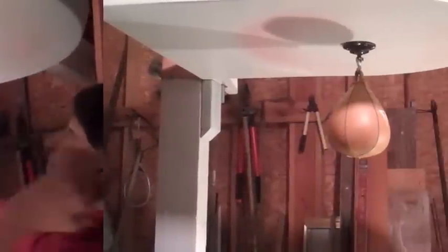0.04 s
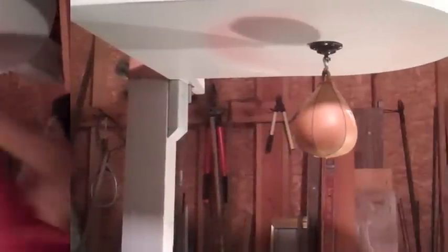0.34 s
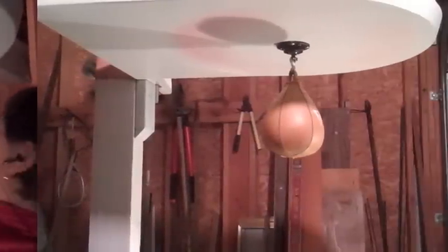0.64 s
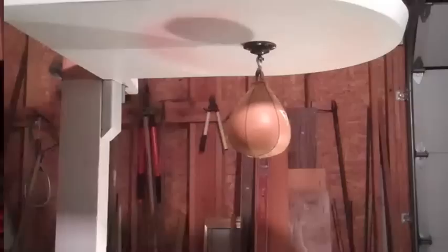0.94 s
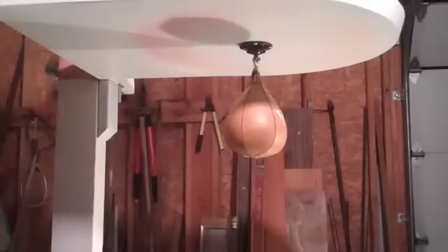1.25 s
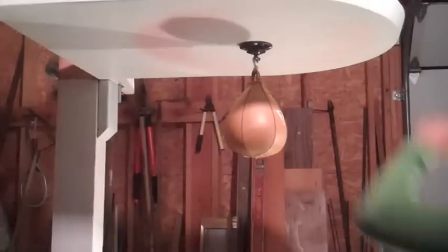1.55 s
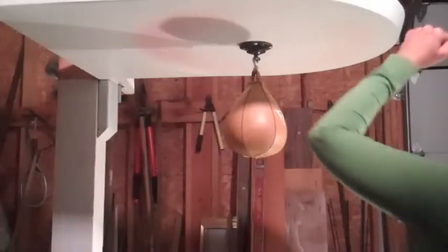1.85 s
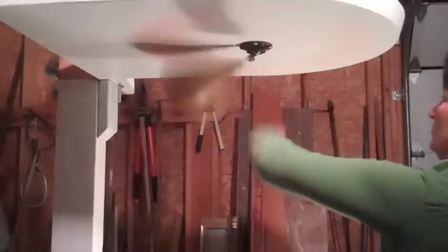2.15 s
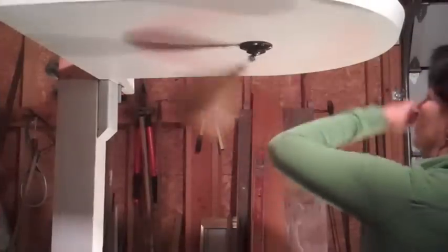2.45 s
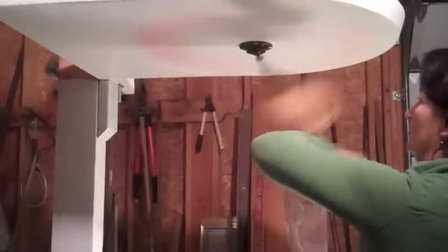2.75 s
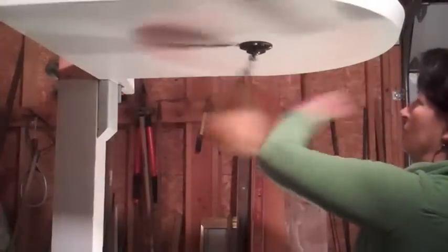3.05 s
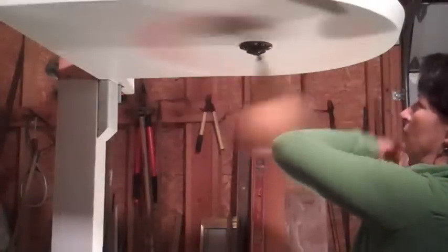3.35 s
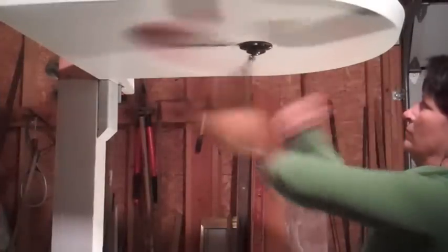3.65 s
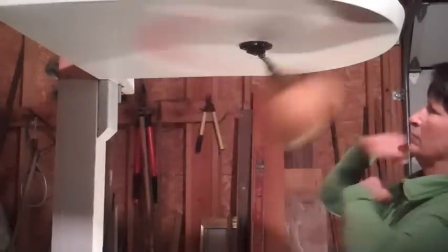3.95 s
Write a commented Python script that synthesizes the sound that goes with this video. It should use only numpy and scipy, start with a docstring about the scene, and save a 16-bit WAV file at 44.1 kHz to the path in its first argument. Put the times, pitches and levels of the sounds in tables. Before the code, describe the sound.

A speed bag is punched close by, hitting its platform about six times a second with sharp slaps, low thuds and metal swivel clacks in a slightly echoing workshop. At about 1 second the flurry stops dead. Faint room noise remains, with two soft bumps around 1.3 and 1.5 seconds. From about 2.1 seconds the rapid rattling rhythm resumes and continues until the end, near 4 seconds.

```python
"""Speed bag in a workshop

A fist strikes a leather bag, which rebounds against its round overhead platform. Each impact radiates a slap
and excites the board's low modes; between impacts the steel swivel clacks. The first flurry breaks off
abruptly, ringing and all, and after a quiet second with soft bumps another begins. Two microphone ports close
by resonate in the treble, and the sharpest slaps overload them."""
import sys
import numpy as np
from scipy import signal
from scipy.fft import rfft, irfft
from scipy.io import wavfile

SR = 44100
rng = np.random.default_rng(int(sys.argv[2]) if len(sys.argv) > 2 else 0)


def master_out(mix):
    """Clip the mix to full scale and print it as 16-bit PCM to the path in sys.argv[1]."""
    frames = np.transpose(np.atleast_2d(mix))
    ceiling = np.clip(frames, -1, 1)
    pcm = np.round(ceiling * 32767).astype(np.int16)
    wavfile.write(sys.argv[1], SR, pcm)


N = 176400

# bag on platform: t/s, slap level/dB, weight of blow/dB, knock f/Hz, knock level/dB
BOARD_IMPACTS = [(.001, 1, -18, 850, 21), (0.117, 15, -18, 1300, 22.5), (0.2761, 1.5, -24.5, 1500, 12.5),
                 (.434, 12, -16, 1360, 18), (.5511, 2, -20.5, 840, 11), (.701, 11.5, -23, 1840, 2),
                 (.887, 6, -27.5, 770, 13), (0.9854, 16, -20.5, 690, 18.5), (1.036, 7.5, -17, 2970, 12),
                 (2.1508, 8.5, -16.5, 1160, 22), (2.2969, 12, -21.5, 1310, 18.5),
                 (2.4783, 8, -26.5, 1300, 15.5), (2.6452, 11.5, -17, 1170, 13),
                 (2.7876, 13.5, -20, 1800, 20), (2.964, 9, -27, 2560, 3), (3.127, 7.5, -18.5, 1130, 0),
                 (3.269, 6.5, -22.5, 780, 17.5), (3.443, 4.5, -27, 4370, 14), (3.5866, 6.5, -20.5, 700, 1),
                 (3.706, 6, -30, 1310, 14), (3.7255, 8, -20.5, 1840, 15.5), (3.887, 11, -26, 7000, 3)]
# fist on bag: t/s, slap level/dB, clatter level/dB, shudder level/dB, dent level/dB
FIST_IMPACTS = [(0.3743, -16, -33, -24.5, -4.5), (.493, 1, -27, -19.5, -7), (2.09, -24, -31, -33, -17),
                (2.585, -2.5, -33.5, -23, -8.5), (3.067, 4, -25.5, -21.5, -13), (3.5299, -8, -37, -25, -13),
                (3.659, -5, -34, -22.5, -6)]
# swivel clacks: t/s, click level/dB, ring level/dB
SWIVEL_CLACKS = [(0.2475, -4.5, -26), (0.4131, 5.5, -16.5), (0.5304, 0, -23), (0.8542, -6, -28.5),
                 (1.021, 7, -14), (2.94, -11, -54), (2.981, -6, -48), (3.421, -9, -58), (3.571, -4, -58)]
# swivel friction: t/s, level/dB, f/Hz
SWIVEL_CHAFES = [(2.326, -46, 1330), (2.944, -41, 1660)]
# bumps in the pause: t/s, dull level/dB, bright level/dB
SOFT_BUMPS = [(1.332, -33.5, -42.5), (1.491, -60, -43)]
# normal modes: f/Hz, level/dB, T60/s
BOARD_MODES = [(88.8, -23, 0.35), (303.3, -9, 0.11), (568.4, -13, 0.19), (809, -19.5, 0.35)]
SWIVEL_MODES = [(2960, 5, 0.009), (3946, -1, 0.079), (4120, -5, .028)]
# spectral envelopes: f/Hz, relative level/dB
SLAP_SPECTRUM = [(60, 0.5), (300, -2), (1200, 2.5), (15000, -3)]
CRINKLE_SPECTRUM = [(1500, -18), (6000, -2)]
RATTLE_SPECTRUM = [(30, -22), (70, -43), (180, -16), (300, 9), (420, 4.5), (5000, 2), (15000, -3.5)]
SWISH_SPECTRUM = [(150, -21), (500, 3), (750, 3), (1200, -12.5), (3000, -21.5)]
SHUDDER_SPECTRUM = [(25, -19.5), (100, -1.5), (170, -3), (400, -11), (700, -13), (2000, -27), (6000, -53)]
BUMP_SPECTRUM = [(40, -16), (280, -0.5), (600, -10.5), (2200, -18.5), (4000, -61)]
ROOM_SPECTRUM = [(25, -7), (120, 12.5), (190, 3), (300, 5.5), (3000, 3), (15000, -3)]
AIR_SPECTRUM = [(25, -15), (60, -15), (140, -8.5), (500, -6.5), (800, -6), (1500, -12), (3500, -17),
                (7000, -19.5), (14000, -21)]
# decay times: f/Hz, T60/s
RATTLE_DECAY = [(100, 0.066), (8000, 0.039)]
ROOM_DECAY = [(100, 0.5), (1200, 0.41), (7000, 0.35), (14000, 0.31)]
# reflections from hard surfaces nearby: delay/s, level/dB
REFLECTIONS = [(.0031, -18), (.012, -11)]
# likeness of left and right: f/Hz, correlation coefficient
COHERENCE = [(300, 0.99), (1000, 0.91), (2000, 0.75), (4000, 0.079), (8000, 0.016)]
# responses of the microphone ports: f/Hz, gain/dB
LEFT_RESPONSE = [(30, -2), (200, -3.5), (4000, 1.5), (6000, 5.5), (7000, 11.5), (7600, 13), (8300, 6),
                 (10000, -3.5), (14000, -12)]
RIGHT_RESPONSE = [(30, 4), (200, -3), (4000, 2), (5500, 5.5), (6300, 12), (7000, 7), (8000, -2.5),
                  (10000, -15), (14000, -17.5)]

CUT_S = 1.0485  # the first flurry and its ringing break off abruptly here
LEAD_S, FLEX_S = 0.0021, 0.0037 - 0.0009  # push ahead of the slap; rise time of the board
SLAP_T60_S, CRINKLE_DB = 0.003, -1
THUMP_HZ, THUMP_T60_S, THUMP_DB = 104.9, 0.16, 7
THUMP_GROWTH = 1.298  # dB of thump per dB of weight
SAG_SHARE, SAG_S = 0.22, 0.037  # the thud's initial excess in pitch and its settling time
KNOCK_Q, KNOCK_ROOM_DB = 9.2, -36.5
RATTLE_DB, ROOM_DB, ROOM_RISE_S = 5.5, -2, 0.0037
SWISH_DB, SWISH_S = -36.5, 0.028
DENT_S, DENT_RISE_S, SHUDDER_T60_S = 0.00068, 0.00006, 0.48
CLACK_CLATTER_DB, CHAFE_S, CHAFE_Q = -29.5, 0.13, 18
LEVEL_SCATTER_DB, PITCH_SCATTER, THUMP_SCATTER = 1.6, 0.01, 0.035
AIR_DB, HUM_HZ, HUM_DB = -51, 134, -60
LOW_CUT_HZ, TOP_HZ, CEILING = 27, 15000, 0.93
AGE = np.arange(int(0.7 * SR)) / SR  # time since an event's onset, in s


def rebounds():
    """Impact excitation: the bag swishes up, starts to push the platform, then slaps flat against it."""
    out = np.zeros((2, N))
    for s, slap_db, weight_db, knock_hz, knock_db in BOARD_IMPACTS:
        add(out, s - SWISH_S, swish())
        add(out, s - LEAD_S, amp(THUMP_DB + THUMP_GROWTH * weight_db) * thump())
        add(out, s, amp(slap_db) * slap() + amp(weight_db) * clatter() + amp(knock_db) * knock(knock_hz))
    return out


def slap(size=2048):
    """Impulsive radiation: a pressure pulse, the leather's crinkle and echoes scattered by fittings."""
    def burst(spectrum):
        x = noise(spectrum, size) * fade(SLAP_T60_S)[:size]
        return x / np.linalg.norm(x[0])
    out = np.zeros((2, len(AGE)))
    pulse = filtered(signal.unit_impulse(size), SLAP_SPECTRUM)
    out[:, :size] = pulse + amp(CRINKLE_DB) * burst(CRINKLE_SPECTRUM)
    for delay, db in REFLECTIONS:
        lag = int(delay * SR * rng.uniform(0.93, 1.07))
        out[:, lag:lag + size] += amp(db) * burst(SLAP_SPECTRUM)
    return out


def thump():
    """Plate vibration: the board's thud starts high under the bag's pressure and sags on release."""
    settled_hz = THUMP_HZ * (1 + THUMP_SCATTER * rng.standard_normal())
    hz = settled_hz * (1 + SAG_SHARE * np.exp(-AGE / SAG_S))
    thud = np.sin(2 * np.pi * np.cumsum(hz) / SR) * fade(THUMP_T60_S)
    return -(thud + ring(BOARD_MODES)) * rise(FLEX_S)


def knock(hz):
    """Resonance: each point of contact favours its own band, which the room briefly sustains."""
    drive = signal.unit_impulse(len(AGE)) + amp(KNOCK_ROOM_DB) * clatter()
    return resonator(drive, hz, KNOCK_Q)


def clatter():
    """Free decay: board and fittings rattle briefly, and the workshop reverberates for longer."""
    rattle = damped(noise(RATTLE_SPECTRUM), RATTLE_DECAY)
    room = damped(noise(ROOM_SPECTRUM), ROOM_DECAY) * rise(ROOM_RISE_S)
    return amp(RATTLE_DB) * rattle + amp(ROOM_DB) * room


def swish():
    """Flow noise: air rushes ahead of the bag, its power growing linearly until contact."""
    return amp(SWISH_DB) * noise(SWISH_SPECTRUM) * np.sqrt(AGE / SWISH_S) * (AGE < SWISH_S)


def punches():
    """Deformation: the fist slaps and dents the leather in one blunt pulse; bag and board shudder."""
    out = np.zeros((2, N))
    dent = (AGE / DENT_S - 1) * np.exp(-AGE / DENT_S) * rise(DENT_RISE_S)
    for s, slap_db, clatter_db, shudder_db, dent_db in FIST_IMPACTS:
        rumble = noise(SHUDDER_SPECTRUM) * fade(SHUDDER_T60_S) * rise(FLEX_S)
        shudder = (rumble + thump()) / 2
        contact = amp(slap_db) * slap() + amp(dent_db) * dent
        add(out, s, contact + amp(clatter_db) * clatter() + amp(shudder_db) * shudder)
    return out


def swivel():
    """Impact and friction: the steel joint clicks, rings in its modes and chafes in a narrow band."""
    out = np.zeros((2, N))
    for s, click_db, ring_db in SWIVEL_CLACKS:
        clink = np.array([ring(SWIVEL_MODES), ring(SWIVEL_MODES)])
        click = slap() + amp(CLACK_CLATTER_DB) * clatter()
        add(out, s, amp(click_db) * click + amp(ring_db) * clink)
    swell = np.sin(np.pi * np.minimum(AGE / CHAFE_S, 1))
    for s, db, hz in SWIVEL_CHAFES:
        chafe = unit_rms(resonator(noise(ROOM_SPECTRUM), hz, CHAFE_Q))
        add(out, s, amp(db) * chafe * swell)
    return out


def workshop():
    """Ambient noise: steady air and a faint hum, with two soft bumps that decay exponentially."""
    hum = np.sqrt(2) * np.sin(2 * np.pi * HUM_HZ * np.arange(N) / SR)
    out = amp(AIR_DB) * noise(AIR_SPECTRUM, N) + amp(HUM_DB) * hum
    for s, dull_db, bright_db in SOFT_BUMPS:
        dull = noise(BUMP_SPECTRUM) * fade(t60=0.35)
        bright = damped(noise(ROOM_SPECTRUM), ROOM_DECAY)
        add(out, s, amp(dull_db) * dull + amp(bright_db) * bright)
    return out


def ring(modes):
    """Modal superposition: damped sinusoids, scattered in level and pitch at each blow."""
    out = np.zeros(len(AGE))
    for hz, db, t60 in modes:
        db += LEVEL_SCATTER_DB * rng.standard_normal()
        hz *= 1 + PITCH_SCATTER * rng.standard_normal()
        out += amp(db) * fade(t60) * np.sin(2 * np.pi * hz * AGE)
    return out


def resonator(x, hz, q):
    """Second-order resonance of bandwidth hz / q."""
    return signal.lfilter(*signal.iirpeak(hz, q, fs=SR), x)


def noise(spectrum, size=len(AGE)):
    """Partial coherence: stereo noise of unit rms, nearly in phase in the bass."""
    hz = np.fft.rfftfreq(size, 1 / SR)
    angle = np.arccos(np.clip(curve(COHERENCE, hz), -1, 1)) / 2
    shaped = rfft(rng.standard_normal((2, size))) * amp(curve(spectrum, hz))
    mid, side = irfft(shaped * [np.cos(angle), np.sin(angle)], size)
    return unit_rms(np.array([mid + side, mid - side]))


def damped(x, decays):
    """Frequency-dependent damping: each band decays with its own T60."""
    hz, t, bands = signal.stft(x, SR, nperseg=256)
    envelopes = np.exp(-np.log(1000) * t / curve(decays, hz)[:, None])
    return signal.istft(bands * envelopes, SR, nperseg=256)[1][:, :len(AGE)]


def filtered(x, gains, size=4096):
    """Minimum-phase filtering: folding the cepstrum makes the response causal."""
    cepstrum = irfft(np.log(amp(curve(gains, np.fft.rfftfreq(size, 1 / SR)))))
    cepstrum[1:size // 2] *= 2
    cepstrum[size // 2 + 1:] = 0
    response = irfft(np.exp(rfft(cepstrum)))[:size // 2]
    return signal.fftconvolve(x, response)[:len(x)]


def fade(t60):
    """Exponential decay by 60 dB in t60 seconds."""
    return np.exp(-np.log(1000) * AGE / t60)


def rise(seconds):
    """First-order growth with the given time constant."""
    return 1 - np.exp(-AGE / seconds)


def curve(points, hz):
    """Interpolation on a logarithmic frequency axis."""
    f, values = np.transpose(points)
    return np.interp(np.log(hz + 1), np.log(f + 1), values)


def amp(db):
    """Amplitude ratio of a level."""
    return 10 ** (np.asarray(db) / 20)


def unit_rms(x):
    """Normalisation to unit power."""
    return x / np.sqrt(np.mean(x ** 2) + 1e-20)


def add(track, s, sound):
    """Superposition at time s; a sound begun before CUT_S is truncated there."""
    start = max(round(s * SR), 0)
    end = min(start + sound.shape[-1], round(CUT_S * SR) if s < CUT_S else N)
    if end > start:
        track[:, start:end] += sound[..., :end - start]


def scene():
    """Linear superposition: the pressures of all sources add."""
    return rebounds() + punches() + swivel() + workshop()


def record(dry):
    """Port resonance and saturation: each side peaks in the treble and overloads, within band limits."""
    ported = np.array([filtered(dry[0], LEFT_RESPONSE), filtered(dry[1], RIGHT_RESPONSE)])
    ported = signal.sosfilt(signal.butter(2, LOW_CUT_HZ, "highpass", fs=SR, output="sos"), ported)
    saturated = ported / (1 + np.abs(ported / CEILING) ** 6) ** (1 / 6)
    return signal.sosfiltfilt(signal.butter(12, TOP_HZ, fs=SR, output="sos"), saturated)


dry = scene()
out = record(dry)
master_out(out)
```